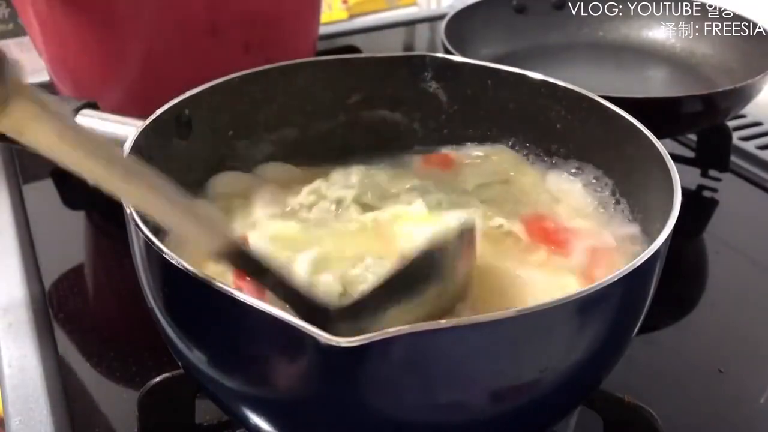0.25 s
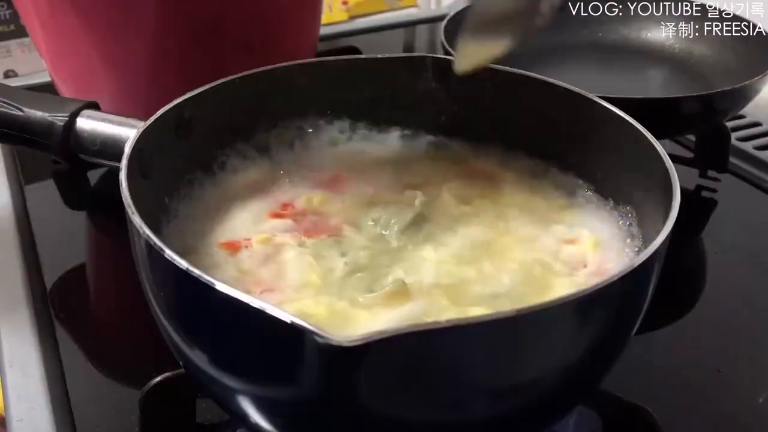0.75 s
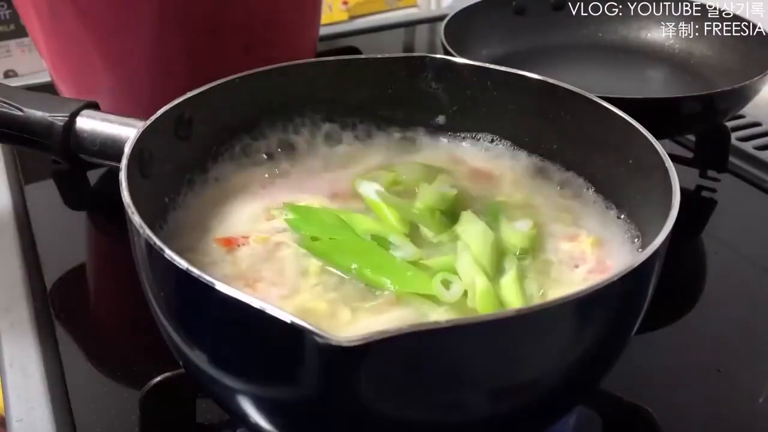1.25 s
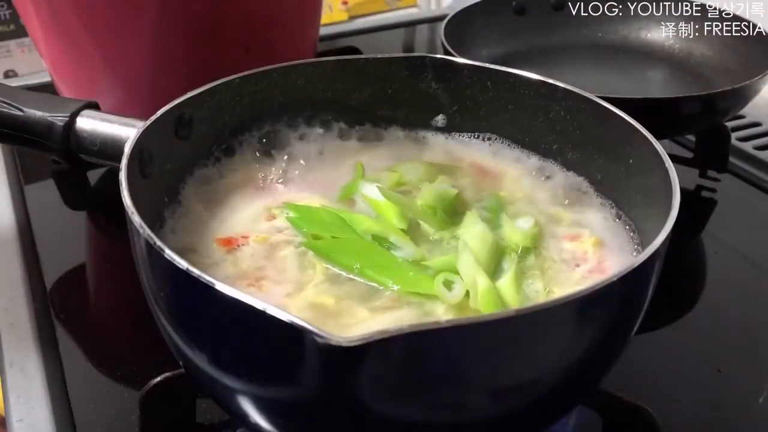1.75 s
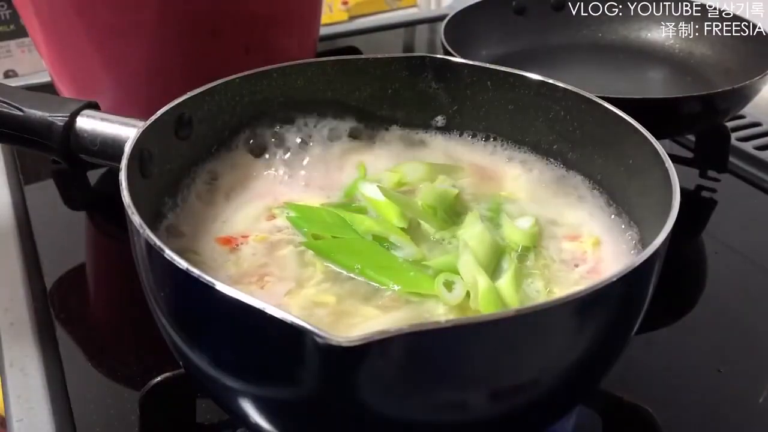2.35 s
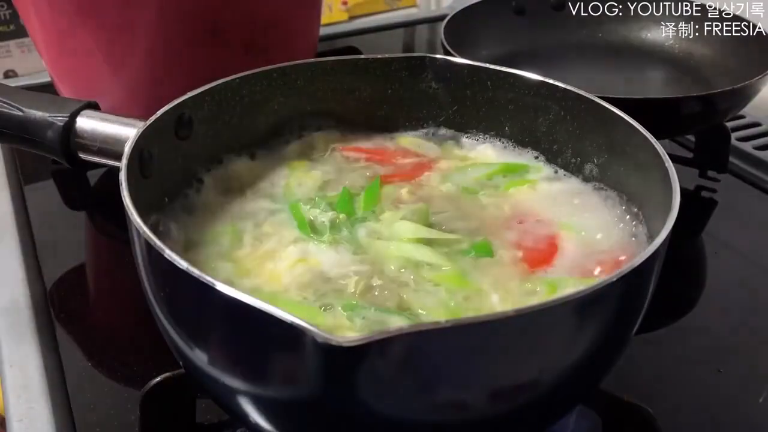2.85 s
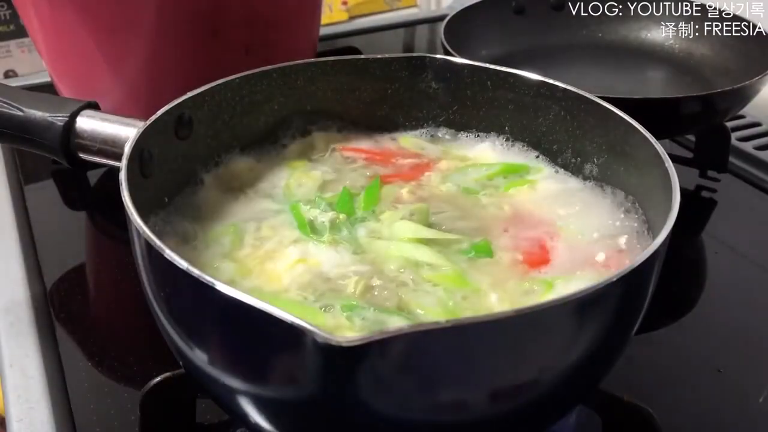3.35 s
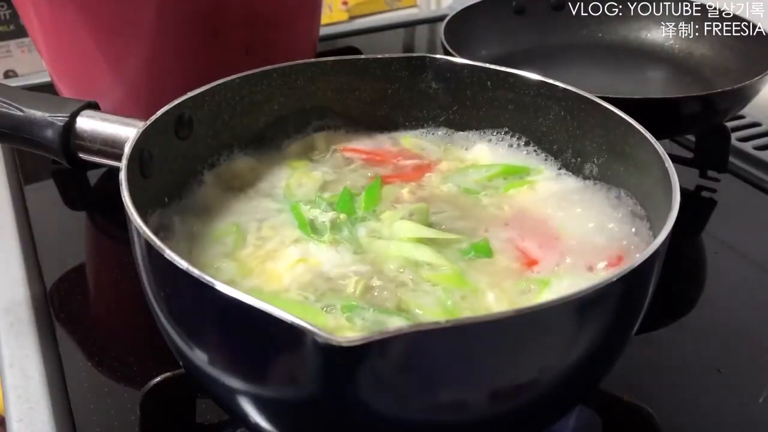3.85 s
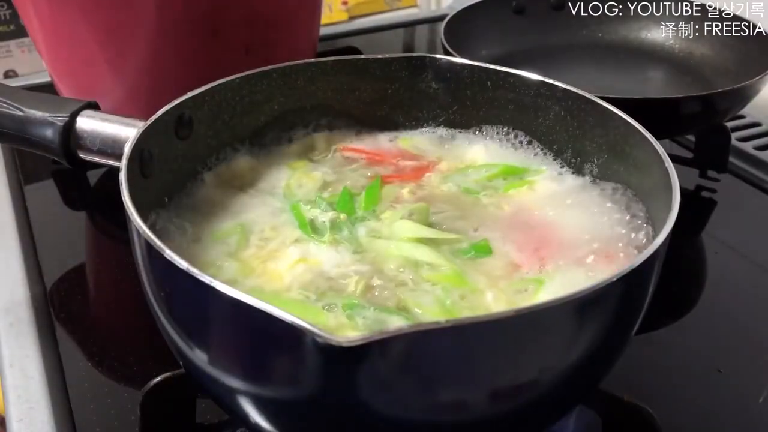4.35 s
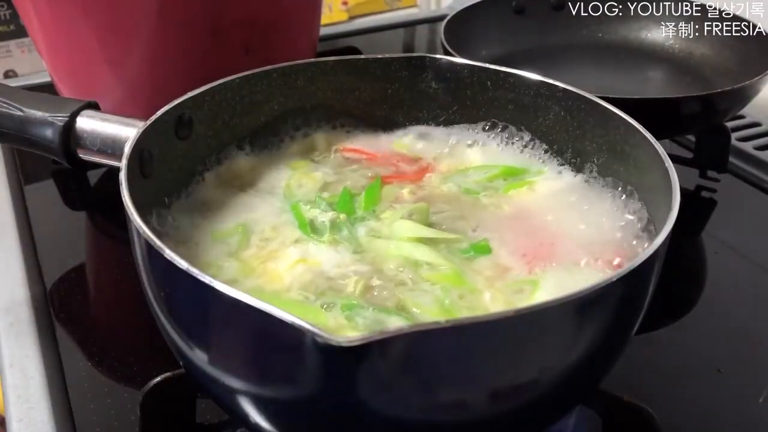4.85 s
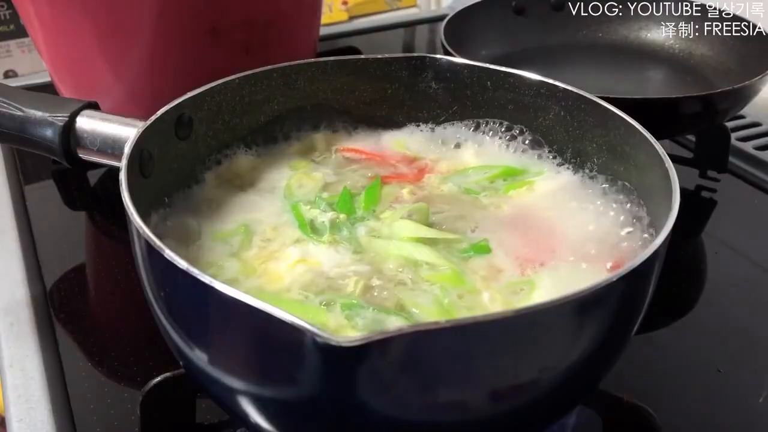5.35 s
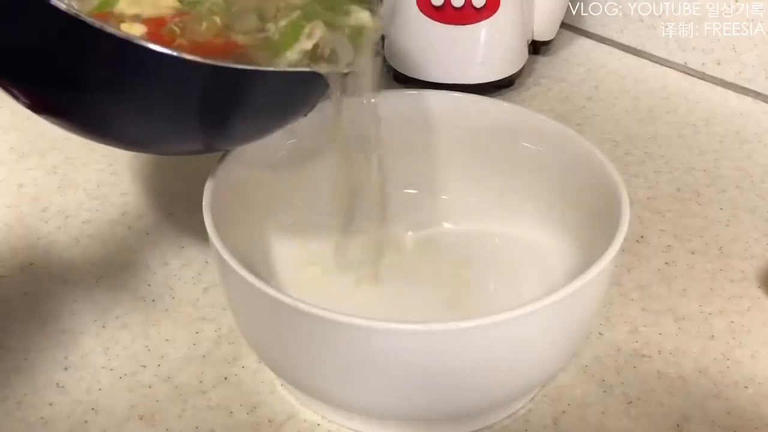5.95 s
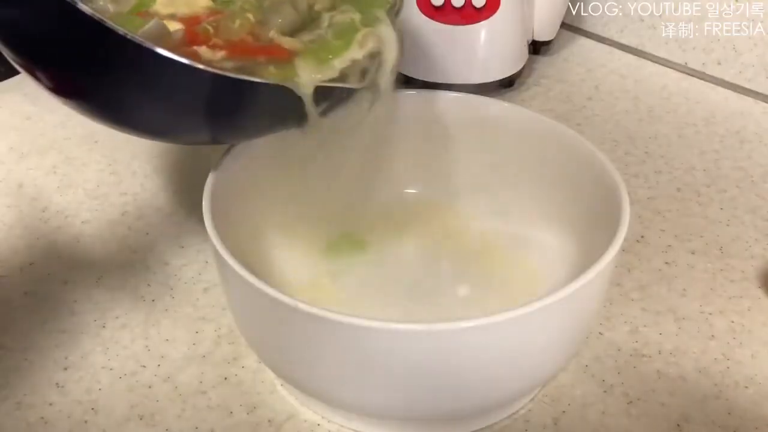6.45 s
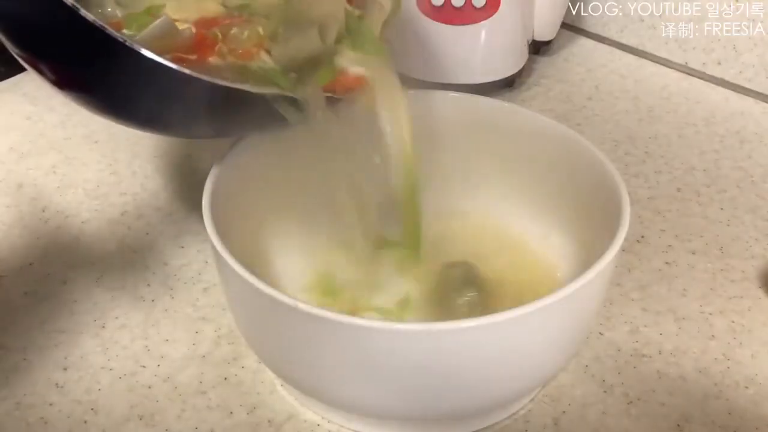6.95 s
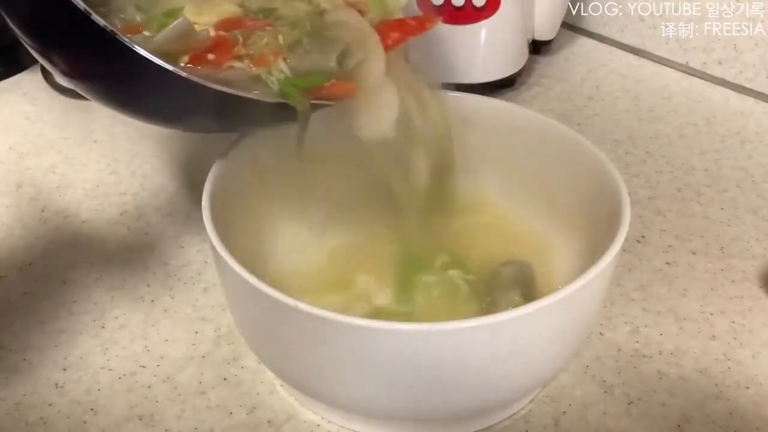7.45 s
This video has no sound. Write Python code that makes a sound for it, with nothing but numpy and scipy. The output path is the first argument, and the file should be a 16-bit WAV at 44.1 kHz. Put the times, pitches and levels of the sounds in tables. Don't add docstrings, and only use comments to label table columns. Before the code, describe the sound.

Close kitchen cooking: ladle knocks, leek ticks, bubbling soup and burner hiss, a squeaky knob and gas roar, then quiet and soup poured into a bowl.

```python
import sys
import numpy as np
from scipy import signal
from scipy.fft import rfft, irfft
from scipy.io import wavfile
from scipy.ndimage import uniform_filter1d

SR = 44100
rng = np.random.default_rng(int(sys.argv[2]) if len(sys.argv) > 2 else 0)


def to_wav(sig):
    pcm = np.clip(np.atleast_2d(sig), -1, 1) * 32767
    pcm = np.round(pcm).astype(np.int16)
    wavfile.write(sys.argv[1], SR, pcm.T)


def convert_level_to_amplitude(level_db):
    exponent = np.asarray(level_db, float) / 20
    return 10 ** exponent


N = 340011
TIME = np.arange(N) / SR

SHOT_ENDS = [
    .862,
    5.1,
    5.512,
]

# (time [s], level [dB])
POUR_FLOW = [(6.045, -75), (6.19, -69), (6.5, -57.5), (6.65, -57.5), (6.74, -68), (7.02, -51.5),
             (7.46, -56), (7.515, -62), (7.535, -47), (7.61, -50), (7.63, -56), (7.693, -55), (7.71, -66)]
# (frequency [Hz], density [dB per Hz])
SPRAY_SPECTRUM = [(1000, -18), (1700, -3.5), (5260, -10.5), (6330, -8), (8680, -5.5), (15500, -22)]
# (time [s], hold [s], rumble [dB], gurgle [dB])
SURGES = [(6.016, 0.0021, -44.5, -50.5), (6.207, 0.22, -59.5, -61.5), (6.378, 0.006, -53.5, -59),
          (6.467, 0.011, -48.5, -65), (6.618, 0.17, -49, -51.5), (6.857, 0.087, -51, -48),
          (7.083, 0, -44.5, -44), (7.18, 0.019, -62, -53), (7.28, 0.069, -59.5, -66.5),
          (7.545, 0, -55, -55), (7.685, 0.012, -73, -62)]
# (time [s], peak [dB], colour [Hz])
SPLASHES = [(6.0547, -29.5, 6250), (6.0704, -27, 4540), (6.134, -38, 5150), (6.2616, -35, 3380),
            (6.295, -37, 5000), (6.387, -38.5, 4120), (6.4833, -37, 4600), (6.512, -36, 3200),
            (6.537, -38, 4900), (6.5676, -43, 4500), (6.576, -36, 7400), (6.622, -34.5, 6500),
            (6.6636, -42, 2820), (6.7492, -33, 4500), (6.813, -31, 5000), (6.8558, -16.5, 9000),
            (6.863, -21, 7500), (6.8772, -13, 6900), (6.96, -33, 8100), (6.998, -33, 5000),
            (7.0076, -30, 6800), (7.059, -31.5, 5000), (7.066, -31.5, 3450), (7.1915, -36, 3000),
            (7.2183, -39, 4360), (7.287, -27.5, 4860), (7.338, -32, 4480), (7.362, -34, 5790),
            (7.4403, -37.5, 3320), (7.5252, -37, 5500), (7.5713, -38, 2400)]
# (time [s], peak [dB], colour [Hz])
SNAPS = [(6.055, -30, 9000), (6.0715, -27, 6000), (1.0815, -30, 6500), (6.5418, -27, 5000),
         (6.586, -22.5, 6500), (6.672, -34, 6000), (6.858, -21, 10500), (6.9635, -23.5, 8500),
         (6.9987, -30, 5300), (7.2875, -31, 7000), (7.3385, -32, 5000), (7.4865, -42, 4500),
         (7.3625, -35, 6500), (7.5125, -39, 7000), (7.5193, -36, 8000), (7.5247, -29, 7500),
         (7.568, -35, 3000), (7.0087, -32, 2800)]
# (time [s], peak [dB], colour [Hz], t60 [s])
GULPS = [(6.262, -37.5, 3150, .04), (6.4465, -36, 4100, 0.022), (6.461, -32, 2620, 0.039),
         (6.471, -41, 2700, .025), (6.486, -39, 2450, .03), (6.512, -33, 2450, .04),
         (6.524, -37, 2700, .03), (6.568, -34.5, 2600, .06), (6.581, -35, 2800, .025),
         (6.663, -39, 2900, .02), (6.68, -41, 2550, .04), (6.836, -31, 7000, .025), (6.849, -31, 3600, .02),
         (6.917, -34, 4600, .015), (7.109, -43, 2800, .025), (7.192, -38, 2900, .02),
         (7.196, -37, 4800, .03), (7.203, -40, 3100, .04), (7.441, -40, 3250, .03),
         (7.537, -39.5, 1880, .12), (7.53, -39, 3200, .06), (7.568, -39, 1610, .05),
         (7.574, -41, 3100, .04), (7.59, -43, 1700, .04), (7.603, -40, 2800, .03), (7.64, -41, 3300, .03),
         (7.678, -42, 4100, .02), (7.591, -42, 3900, .06), (6.3, -39, 5100, .025), (7.688, -43, 2900, .03)]
# (time [s], peak [dB], colour [Hz])
DROPLETS = [(6.003, -47, 10000), (6.0147, -44, 9990), (6.1619, -42, 12000), (6.337, -42, 9500),
            (6.2885, -46, 8500), (6.389, -37, 8200), (6.5345, -41, 11000), (6.476, -45, 9500),
            (6.308, -44, 5500), (7.634, -48, 7500), (7.662, -48, 7500), (7.2205, -38, 7500),
            (7.05, -41, 6500), (6.3726, -41, 7800), (6.3974, -41, 11200), (6.4125, -42, 7250),
            (6.424, -36, 7100), (6.4354, -32.5, 7180), (6.5146, -35, 10900), (6.784, -28.5, 8000),
            (6.8054, -37, 8100), (6.84, -39, 8000), (6.9524, -29, 9500), (7.151, -34, 5240),
            (7.088, -32, 8390), (7.1299, -36, 7300), (7.1733, -38, 3770), (7.183, -36, 7000),
            (7.246, -33, 6750), (7.264, -32.5, 8500), (7.2974, -43, 8390), (7.376, -33, 7140),
            (7.386, -31, 6500), (7.4222, -35, 5520), (6.6266, -35, 7500), (6.6795, -31, 7500),
            (6.7333, -46, 6000), (6.618, -40, 6000), (6.47, -41, 5500), (6.649, -41, 7500),
            (7.6735, -41, 7110), (7.487, -43, 4500)]

# (frequency [Hz], level [dB], t60 [s])
BOWL_MODES = [(1642, 5.5, 0.12), (2450, -7, 0.12), (2950, -20, .08), (3900, -17, 0.096), (4200, -6, 0.14),
              (5780, -6, .055), (6950, -13, .13), (8100, -20, .12)]
# (time [s], level [dB], loudest mode [Hz])
BOWL_BLOWS = [(5.9544, -37, 2300), (5.956, -45, 3900), (5.958, -44, 5900), (6.054, -45, 4300),
              (6.0707, -35, 4300), (6.0712, -42, 6900), (6.072, -52, 2950), (6.135, -52, 4300),
              (6.217, -47.5, 4300), (6.219, -50, 6900), (6.857, -41, 4200), (6.879, -40, 4200),
              (6.88, -44, 1700), (7.59, -47, 4200)]
# (time [s], peak [dB], colour [Hz], t60 [s])
DRIPS = [
    (5.7115, -38.5, 6820, 0.17),
    (5.8618, -38.5, 6820, 0.077),
]
# (frequency [Hz], level [dB], t60 [s])
DRIP_MODES = [
    [(2400, -14, .06), (2800, -15, 0.098), (3860, -14, 0.14), (4230, -15, .13), (4900, -10, .06),
     (5550, -10, .12), (6850, 2, .07), (7100, 2.5, .05), (8180, -6, .06), (9825, -20, .09),
     (11100, -17, .09), (11490, -13.5, .07)],
    [(2400, -13, 0.066), (3850, -7.5, 0.12), (4450, -10, 0.1), (4830, -4, 0.06), (5150, -6, .06),
     (5850, -10, .08), (6830, 3.5, .06), (7130, -1, .07), (9674, -18, .1), (10500, -2, .035),
     (11000, -9, 0.07)],
]
# (time [s], level [dB])
POT_BUMP = (5.9555, -20)
# (frequency [Hz], level [dB], t60 [s])
WORKTOP_MODES = [(115, -3, 0.32), (249, 4, 0.079), (348.4, -2.5, 0.12), (475, -27, 0.078),
                 (629, 5.5, 0.026), (818, -11, 0.3), (876, 5.5, 0.028), (1250, -6, 0.03), (1600, -13, 0.08)]

# (frequency [Hz], level [dB], t60 [s])
POT_MODES = [(241, 1.5, 0.07), (530, 0.5, 0.085), (960, 4.5, 0.024), (1160, 3, 0.019), (1970, 1.5, 0.04),
             (2270, -3, 0.03), (2680, -4.5, 0.059), (3450, -7, 0.035), (3935, -13, 0.086),
             (4900, -9, 0.045), (5150, -18, 0.043), (5450, -9, 0.041), (6140, -19, 0.062)]
# (time [s], hold [s], level [dB])
SCRAPES = [
    (0.39, 0.04, -45),
    (0.6, 0.24, -58),
    (0.75, 0.037, -48),
]
# (time [s], level [dB], loudest mode [Hz])
CATCHES = [(.358, -41, 1970), (.37, -42, 1970), (.378, -44, 3450), (.396, -45, 1160), (.428, -45, 1970),
           (.366, -41, 2680), (.372, -43, 2270), (.376, -48, 4900), (.385, -41, 1970), (.398, -41, 3935),
           (.398, -43, 2270), (.408, -40, 3450), (.409, -47, 5450), (.411, -44, 960), (.444, -43, 5450),
           (.449, -47, 4900), (.446, -42, 3450), (.447, -45, 2680), (.466, -45, 5150), (.5, -47, 5450),
           (.578, -49, 960), (.628, -48, 3935), (.652, -47, 5450), (.695, -45, 5450), (.732, -46, 3935),
           (.748, -48, 1970), (3.108, -39, 2050)]
# (time [s], hold [s], hiss [dB], slosh over the hiss [dB])
SWISHES = [
    (2.845, .012, -58, 12.5),
    (2.89, 0.076, -55.5, 9),
    (2.961, 0.043, -40.5, -1.5),
    (3.101, 0.021, -54, 20),
    (3.154, 0.084, -65, 16),
]
# (time [s], peak [dB], colour [Hz])
STIR_KNOCKS = [
    (0.3372, -31, 1770),
    (0.344, -31, 238),
    (0.369, -36, 245),
    (0.454, -33.5, 228),
    (0.82, -27.5, 538),
    (0.828, -27.5, 320),
    (0.841, -34.5, 303),
    (0.851, -36, 273),
]
# (time [s], peak [dB], colour [Hz],
# t60 [s])
KNOCKS = [(1.174, -35, 248, 0.047), (2.842, -29, 895, .04), (2.849, -29, 202, .08),
          (3.096, -19, 900, 0.051), (3.124, -26, 1800, .05), (3.104, -25.5, 380, 0.055),
          (4.648, -29, 670, 0.064), (4.66, -21, 690, .07), (5.302, -21.5, 230, 0.064),
          (5.326, -15.5, 260, 0.11), (5.954, -26, 585, 0.066), (5.97, -24, 342, 0.13),
          (3.146, -31, 400, .04), (4.59, -35, 62, .25)]

# (time [s], peak [dB], colour [Hz])
LEEKS = [(0.41, -44, 3900), (0.749, -37, 2800), (0.818, -28.5, 4830), (1.0454, -35, 8610),
         (1.066, -26, 6130), (1.067, -32.5, 2500), (1.0807, -37, 8360), (1.1227, -30, 2330),
         (1.1426, -31, 8800), (1.1421, -32, 2200), (1.162, -35, 5500)]
# (time [s], peak [dB], colour [Hz])
PLOPS = [(0.655, -41, 516), (1.064, -30, 821), (1.166, -34, 750), (1.705, -31, 360), (1.753, -35, 255),
         (2.459, -36, 285), (6.253, -39.5, 730), (6.281, -39.5, 1650), (6.373, -32.5, 282),
         (6.749, -26, 283), (6.856, -32.5, 200), (6.879, -27, 1020), (6.945, -34, 553), (7.061, -28, 905),
         (7.066, -31, 900), (7.084, -26, 420), (7.287, -36.5, 1510), (7.538, -27, 900), (7.549, -28, 850),
         (7.567, -30.5, 880), (7.599, -36, 1854), (7.68, -39.5, 900)]
# (time [s], peak [dB], colour [Hz])
POPS = [(1.477, -43, 2090), (1.519, -44, 1160), (1.649, -42, 1150), (1.709, -39, 802), (1.898, -38, 1800),
        (2.019, -44, 1130), (2.113, -39.5, 1120), (2.445, -41.5, 1130), (2.631, -38, 1120),
        (2.698, -37, 1560), (2.749, -43, 1150), (3.219, -41, 821), (3.399, -49, 1120), (3.619, -44.5, 816),
        (3.779, -37, 1130), (4.067, -42, 1120), (4.299, -42, 1060)]

# (time [s], peak [dB], colour [Hz], t60 [s])
KNOB_SQUEAKS = [
    (4.582, -24, 8060, 0.16),
    (4.616, -27, 8100, 0.066),
    (4.623, -23, 8160, 0.11),
]
# (frequency [Hz], level [dB], t60 [s])
HOB_MODES = [(293, -5, .1), (420, -0.5, .08), (690, 3, 0.13), (950, 0, .07), (2200, -14, .06)]
# (time [s], level [dB])
GAS_FLOW = [(4.578, -56), (4.646, -53), (4.67, -38.5), (4.695, -40), (4.72, -46), (4.74, -44.5),
            (4.76, -39.5), (4.905, -50.5), (4.96, -47.5), (5.506, -47), (5.511, -65)]
# (frequency [Hz], density [dB per Hz])
GAS_SPECTRUM = [(710, -31), (1200, -33), (1410, -5), (2380, -6.5), (2590, -5), (8880, -0.5), (14200, -6.5),
                (15500, -15)]
# (frequency [Hz], width [Hz], level [dB])
JET_WHISTLES = [(1584, 30, -19.5), (1800, 60, -24), (2350, 27, -18.5), (3460, 100, -18), (4070, 73, -21),
                (5220, 68, -26), (6850, 120, -21), (7170, 30, -25), (8630, 100, -21)]
# (time [s], hold [s], roar [dB], upper hollow over the roar [dB])
FLAME_PUFFS = [
    (4.554, 0.047, -56, 2),
    (4.67, 0.03, -55, -6),
    (4.775, 0.08, -41, -2.5),
    (4.96, 0.53, -49, -2),
    (5.055, 0.06, -50, 8),
    (5.319, 0.076, -46, -16),
]

# (frequency [Hz], density [dB per Hz])
STIR_SPECTRUM = [(18, -39), (30, -7), (177, -10.5), (332, -8), (443, -20), (492, -15), (728, -22),
                 (1110, -13.5), (1590, -14), (8950, -18), (15500, -30)]
# (frequency [Hz], density [dB per Hz])
SIMMER_SPECTRUM = [(18, -41), (30, -7.5), (90, 1), (492, -9), (709, -9.5), (1140, -4.5), (1330, -8.5),
                   (2020, -7), (7650, -12), (8720, -9), (10500, -13.5), (14000, -18), (15500, -27)]
# (frequency [Hz], density [dB per Hz])
COUNTER_SPECTRUM = [(18, -48), (30, -18), (75, -5), (108, -15.5), (237, -7.5), (277, -6.5), (359, -16),
                    (1970, -32), (8500, -37.5), (15500, -42)]
# (frequency [Hz], width [Hz], level [dB])
BURNER_WHISTLES = [(1126, 45, 6), (1975, 150, -2), (4010, 76, -6), (5600, 120, -7.5), (6850, 90, -3.5),
                   (8625, 36, 8), (8960, 60, -1), (8300, 230, -5.5), (9800, 44, -10), (5080, 100, -7)]


def level(x, db):
    return x * convert_level_to_amplitude(db) / np.sqrt(np.mean(x ** 2))


def noise(spectrum):
    hz, db = np.transpose(spectrum)
    log_hz = np.log(np.fft.rfftfreq(N, 1 / SR) + 1)
    gain = convert_level_to_amplitude(np.interp(log_hz, np.log(hz), db))
    return level(irfft(rfft(rng.standard_normal(N)) * gain, N), 0)


def band(x, hz, width):
    hz, width = min(hz, SR / 3), min(width, SR / 3)
    return signal.lfilter(*signal.iirpeak(hz, hz / width, SR), x + np.finfo(float).eps ** 2)


def colour(x, hz, width):
    return band(band(x, hz, width), hz, width)


def walk(rate):
    k = int(SR / rate)
    steps = np.repeat(rng.standard_normal(N // k + 1), k)
    return level(uniform_filter1d(uniform_filter1d(steps, k), k)[:N], 0)


def flow_gain(table):
    s, db = np.transpose(table)
    return convert_level_to_amplitude(np.interp(TIME, s, db, left=-200, right=-200))


def swells(rows, rise_db_s, fall_db_s):
    t = TIME[::32]
    curves = []
    for s, hold, db in rows:
        rise = rise_db_s * np.maximum(s - t, 0)
        fall = fall_db_s * np.maximum(t - s - hold, 0)
        curves.append(db - rise - fall)
    return np.interp(TIME, t, convert_level_to_amplitude(np.max(curves, axis=0)))


def fade(t, t60):
    return np.exp(-np.log(1000) * t / max(t60, .005))


def click(seconds):
    return 1. * (np.arange(int(seconds * SR)) == 0)


def ring(x, modes):
    out = 0
    for hz, db, t60 in modes:
        pole = np.exp((2j * np.pi * hz - np.log(1000) / t60) / SR)
        out = out + convert_level_to_amplitude(db) * signal.lfilter([1], [1, -pole], x + np.finfo(float).eps ** 2).imag
    return out


def add(out, s, x):
    i = int(s * SR)
    out[i:i + len(x)] += x[:N - i]


def lasting(rows, t60):
    return [(*row, t60) for row in rows]


def bursts(table, spread, crack_db, rise=0.00036):
    out, t = np.zeros(N), TIME[:SR // 5]
    for s, db, hz, t60 in table:
        x = rng.standard_normal(len(t))
        tail = level(colour(x, hz, spread * hz), 0) * fade(t, t60)
        crack = colour(click(0.2), hz, 1.6 * hz)
        add(out, s, convert_level_to_amplitude(db - 9.0) * ((1 - np.exp(-t / rise)) * tail + convert_level_to_amplitude(crack_db) * crack / crack.max()))
    return out


def blows(table, modes, narrow_db):
    out = np.zeros(N)
    for s, db, centre_hz in table:
        woken = [(hz, g - narrow_db * np.log2(hz / centre_hz) ** 2, t60) for hz, g, t60 in modes]
        add(out, s, convert_level_to_amplitude(db) * ring(click(0.25), woken))
    return out


def bubbles(count, lo_hz, hi_hz, cycles, scatter_db):
    out = np.zeros(N)
    for s, pitch, size in rng.random((count, 3)):
        hz = lo_hz * (hi_hz / lo_hz) ** pitch
        turns = np.arange(int(3 * cycles * SR / hz)) * hz / SR
        wave = np.sin(2 * np.pi * turns * (1 + 0.11 * turns / cycles)) * np.exp(-2 * turns / cycles)
        add(out, s * TIME[-1], convert_level_to_amplitude(-scatter_db * np.log(size + 1 / 50)) * wave)
    return level(out, 0)


def pour():
    afterspray = [(s, 0, db - 26.5) for s, db, _ in SPLASHES]
    spray = flow_gain(POUR_FLOW) + swells(afterspray, rise_db_s=3000, fall_db_s=330)
    fizz = bubbles(count=3600, lo_hz=2100, hi_hz=6000, cycles=9.0, scatter_db=3.5)
    crackle = bubbles(count=4000, lo_hz=3600, hi_hz=12100, cycles=3.0, scatter_db=2.5)
    patchy = convert_level_to_amplitude(4 * walk(70))
    wet = spray * (convert_level_to_amplitude(-13.5) * patchy * noise(SPRAY_SPECTRUM) + convert_level_to_amplitude(-6.5) * fizz + convert_level_to_amplitude(-9.0) * crackle)

    rumble = swells([row[:3] for row in SURGES], rise_db_s=600, fall_db_s=167)
    shake = noise([(30, -14), (60, 2.0), (120, 1.5), (250, -1.0), (650, -10.0), (1000, -35.0)])
    loaded_worktop = [(hz, db, .06) for hz, db, _ in WORKTOP_MODES]
    thud = rumble * level(shake + level(ring(shake, loaded_worktop), 0), 0)

    gurgle = swells([(s, 0.29 * hold, db) for s, hold, _, db in SURGES], rise_db_s=600, fall_db_s=232)
    glug = convert_level_to_amplitude(-2.5) * gurgle * bubbles(count=800, lo_hz=220, hi_hz=820, cycles=3.5, scatter_db=4.0)
    lumps = splashes()
    return wet + thud + glug + lumps + convert_level_to_amplitude(-47) * ring(wet + lumps, BOWL_MODES)


def splashes():
    out, t = np.zeros(N), TIME[:SR // 8]
    for s, db, hz in SPLASHES:
        x = rng.standard_normal(len(t))
        t60 = 0.038 * (4000 / hz) ** 0.2 * convert_level_to_amplitude(0.14 * (db + 29))
        tail_db = -6.5 - 2.5 * np.log2(hz / 4000)
        spray = level(colour(x, hz, min(0.93 * hz, 6500)) + convert_level_to_amplitude(-14) * x, 0)
        bubble = convert_level_to_amplitude(-6.0) * np.sin(2 * np.pi * hz * t * (1 + 2.9 * t)) * (hz < 4500)
        swell = (1 - np.exp(-t / 0.00097)) * fade(t, t60)
        crack = colour(click(0.125), hz, 1.2 * hz)
        add(out, s, convert_level_to_amplitude(db + tail_db - 1.0) * swell * (spray + bubble))
        add(out, s + 0.001194, convert_level_to_amplitude(db - 3.5 + 2.7 * np.log2(hz / 6000)) * crack / crack.max())
    snaps = bursts(lasting(SNAPS, t60=0.01), spread=0.74, crack_db=7.5, rise=0.00018)
    gulps = bursts(GULPS, spread=0.12, crack_db=-14, rise=.0008)
    droplets = bursts(lasting(DROPLETS, t60=0.014), spread=0.68, crack_db=3.5)
    return out + snaps + gulps + droplets


def china():
    out = np.zeros(N)
    for (s, db, *_), modes in zip(DRIPS, DRIP_MODES):
        add(out, s, convert_level_to_amplitude(db - 11) * ring(click(1 / 3), modes))
    push = np.convolve(click(1 / 3), signal.windows.hann(14))
    damped_worktop = [(hz, db, min(t60, .22)) for hz, db, t60 in WORKTOP_MODES]
    bump_s, bump_db = POT_BUMP
    add(out, bump_s, convert_level_to_amplitude(bump_db - 26.0) * ring(push, damped_worktop))
    spatter = convert_level_to_amplitude(-8.5) * bursts(DRIPS, spread=2.0, crack_db=-6)
    return out + blows(BOWL_BLOWS, BOWL_MODES, narrow_db=50) + spatter


def ladle():
    return scrape() + swish() + knocks()


def scrape():
    slips = (rng.random(N) < 1500 / SR) * rng.standard_normal(N) * convert_level_to_amplitude(4.0 * walk(40.17))
    rub = swells(SCRAPES, rise_db_s=164, fall_db_s=185) * (TIME > STIR_KNOCKS[0][0])
    wall = sum(ring(rub * slips * convert_level_to_amplitude(3 * walk(45)), [mode]) for mode in POT_MODES)
    wall = wall / np.std(ring(slips, POT_MODES))
    grit = rub * level(band(slips, 1100, 3700), -2.4)
    even_wall = [(hz, -7.0, 0.083 * (hz / 4000) ** 0.33) for hz, *_ in POT_MODES[2:]]
    return convert_level_to_amplitude(-1.0) * wall + grit + blows(CATCHES, even_wall, narrow_db=150)


def swish():
    hiss = swells([row[:3] for row in SWISHES], rise_db_s=544, fall_db_s=320)
    body = swells([(s, hold, db + wet_db) for s, hold, db, wet_db in SWISHES], rise_db_s=3000, fall_db_s=228)
    edge = noise([(1200, -31), (2500, 5.5), (7000, 1.0), (12000, -10), (15500, -19)])
    slosh = noise([(80, -25), (200, -3.0), (600, -2.5), (1200, -6.0), (2200, -7.5), (3500, -44)])
    return hiss * convert_level_to_amplitude(1.5 * walk(80)) * edge + convert_level_to_amplitude(-3.5) * body * convert_level_to_amplitude(2.0 * walk(60)) * slosh


def knocks():
    first_s, wall = STIR_KNOCKS[0][0], POT_MODES[2:]
    early = bursts(lasting(STIR_KNOCKS, t60=0.063), spread=1.6, crack_db=1.0, rise=0.00064)
    early = early * (TIME < SHOT_ENDS[0])
    clank = convert_level_to_amplitude(-44) * (np.arange(N) == int(first_s * SR))
    rim = blows([(first_s, -33.5, 2000), (first_s, -37, 1050)], wall, narrow_db=60)
    early = early + rim + ring(clank + convert_level_to_amplitude(-44) * early, wall)
    late = bursts(KNOCKS, spread=1.0, crack_db=-6.5, rise=0.002)
    knob_plate = convert_level_to_amplitude(-42.5) * ring(bursts(KNOCKS[6:8], spread=1.4, crack_db=5.0), HOB_MODES)
    return early + late + convert_level_to_amplitude(-54.5) * ring(late, WORKTOP_MODES[2:]) + knob_plate


def food():
    pops = [(s, db + 5.0, 0.86 * hz) for s, db, hz in POPS]
    leeks = bursts(lasting(LEEKS, t60=0.031), spread=0.99, crack_db=-18)
    return leeks + bursts(lasting(PLOPS + pops, t60=0.048), spread=0.76, crack_db=-3.5, rise=0.0018)


def hum(hz):
    return convert_level_to_amplitude(2.6 * walk(35)) * np.sin(2 * np.pi * hz * np.cumsum(1 + 0.03 * walk(40)) / SR)


def flare():
    gas, lit = flow_gain(GAS_FLOW), TIME < SHOT_ENDS[2]
    upper_puffs = [(s, hold, db + up_db) for s, hold, db, up_db in FLAME_PUFFS]
    roar = lit * swells([row[:3] for row in FLAME_PUFFS], rise_db_s=330, fall_db_s=260)
    upper = lit * swells(upper_puffs, rise_db_s=330, fall_db_s=260)
    flutter = convert_level_to_amplitude(-4.5) * np.sqrt(gas * roar)
    air = rng.standard_normal(N)
    hollow = level(hum(121) + level(band(air, 160, 140), -4.5), 0)
    mid = sum(convert_level_to_amplitude(3.0 * walk(20)) * band(air, hz, 45) for hz in (275, 400, 540))
    mid = level(mid + convert_level_to_amplitude(-13.0) * band(air, 1000, 580), 0)
    whistles = sum(convert_level_to_amplitude(db + 3.3 * walk(14)) * level(band(air, hz, w), 0) for hz, w, db in JET_WHISTLES)
    rush = gas * convert_level_to_amplitude(4.5 + 1.3 * walk(30)) * (noise(GAS_SPECTRUM) + whistles)
    return rush + roar * hollow + upper * hum(200) + flutter * mid + knob()


def knob():
    rasps = [(s, db, 1.14 * hz, 0.75 * t60) for s, db, hz, t60 in KNOB_SQUEAKS]
    clunks = [(s, db - 14.0, hz, 0.54 * t60) for s, db, _, t60 in KNOB_SQUEAKS for hz in (1750, 2000)]
    squeak = bursts(KNOB_SQUEAKS, spread=0.081, crack_db=-14, rise=.003)
    rasp = bursts(rasps, spread=0.5, crack_db=-16, rise=0.0025)
    return squeak + rasp + bursts(clunks, spread=0.08, crack_db=-10, rise=0.0012)


def backgrounds():
    whistles = []
    for hz, width, db in BURNER_WHISTLES:
        tone = level(band(rng.standard_normal(N), hz, width), 0)
        whistles.append(convert_level_to_amplitude(db + 0.9 * walk(9.9)) * tone * np.sqrt(width))
    blips = bubbles(count=900, lo_hz=230, hi_hz=1400, cycles=2.6, scatter_db=3.2)
    stir = level(noise(STIR_SPECTRUM) + level(whistles[0], -14.0) + level(blips, -13.0), -53)
    hiss = noise(SIMMER_SPECTRUM) + level(blips, -12.0)
    simmer = level(hiss + level(sum(whistles), -3.5), -48.5)
    flaring = level(hiss, -49)
    counter = level(noise(COUNTER_SPECTRUM), -63)
    return np.choose(np.searchsorted(SHOT_ENDS, TIME), [stir, simmer, flaring, counter])


def scene():
    close = pour() + china() + ladle() + food()
    t = TIME[:SR // 3]
    tail = rng.standard_normal(len(t)) * fade(t, 0.16) * (t > .004)
    kitchen = signal.fftconvolve(close, convert_level_to_amplitude(-12.0) * tail / np.linalg.norm(tail))[:N]
    return np.tile(flare() + close + kitchen + backgrounds(), (2, 1))


def low_pass(x):
    return signal.sosfilt(signal.butter(12, 16360, fs=SR, output="sos"), x)


def record(dry):
    rounded = np.tanh(4 * dry) / 4
    top_cut = signal.ellip(8, .2, 28, 15020, fs=SR, output="sos")
    bass_cut = signal.butter(4, 38, "high", fs=SR, output="sos")
    mix = signal.sosfilt(bass_cut, signal.sosfilt(top_cut, rounded))
    return low_pass(mix)


dry = scene()
out = record(dry)
to_wav(out)
```